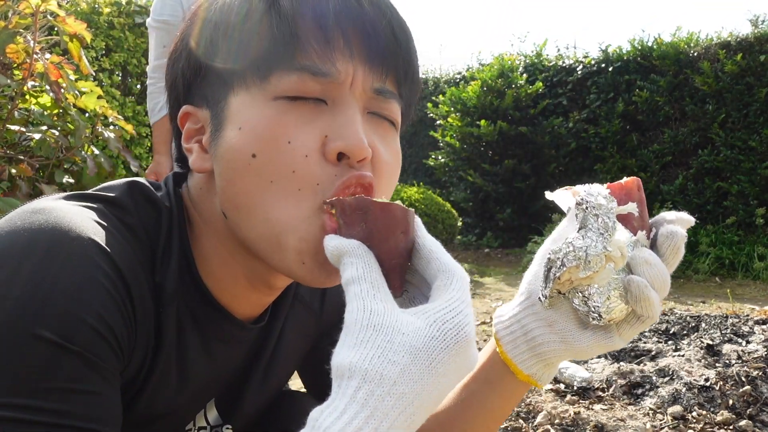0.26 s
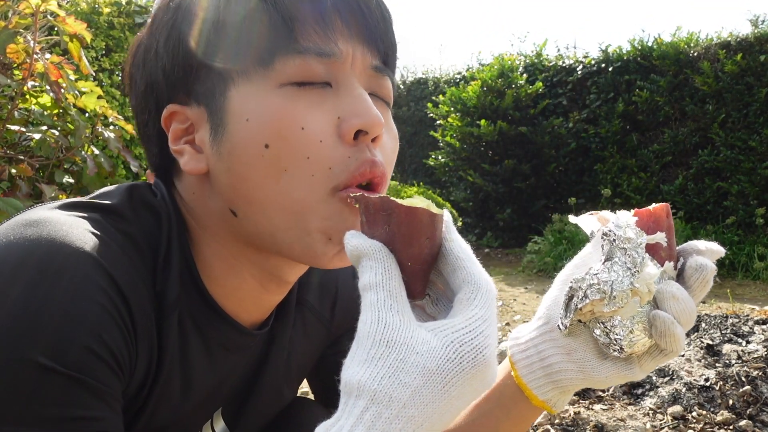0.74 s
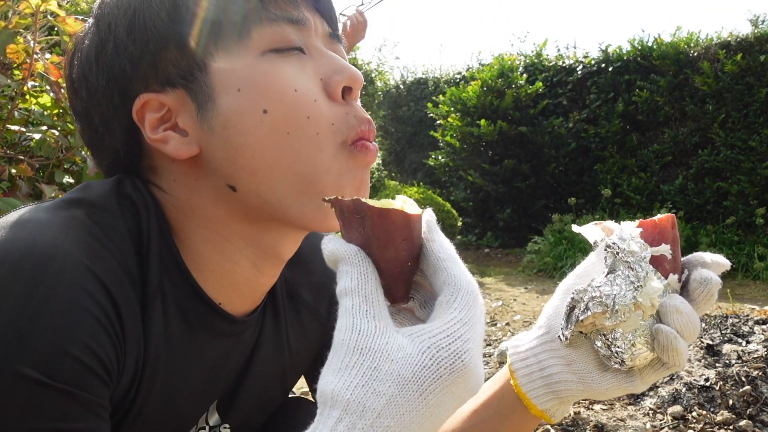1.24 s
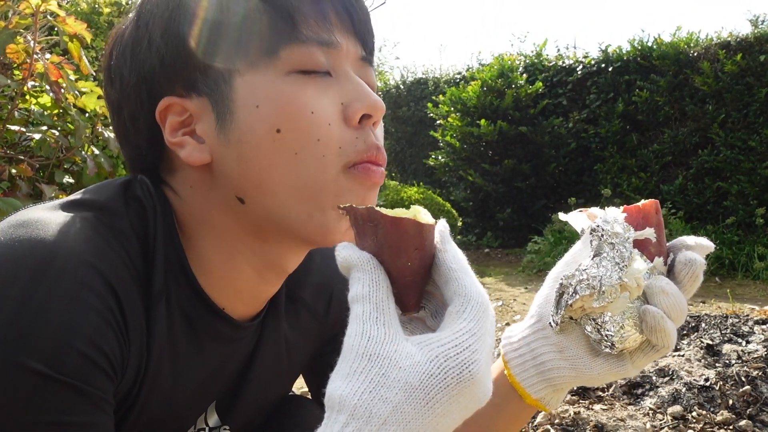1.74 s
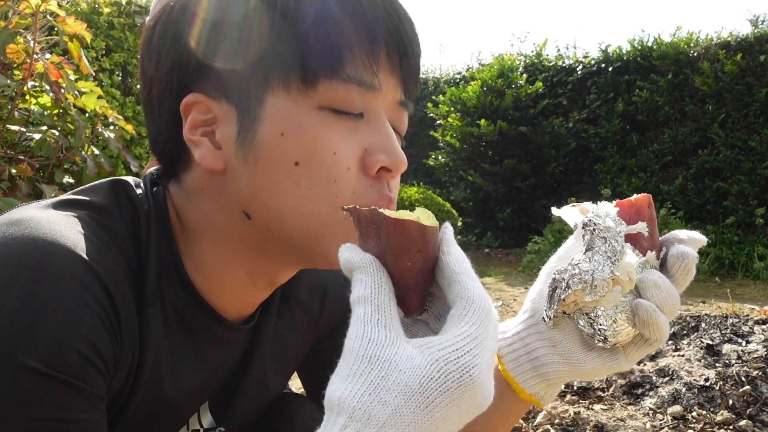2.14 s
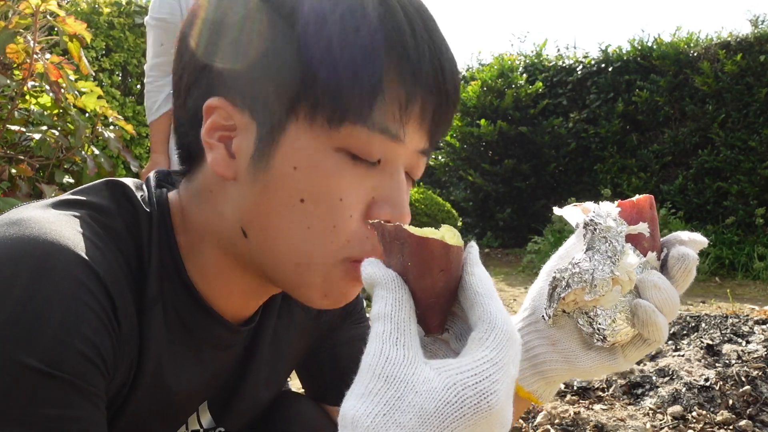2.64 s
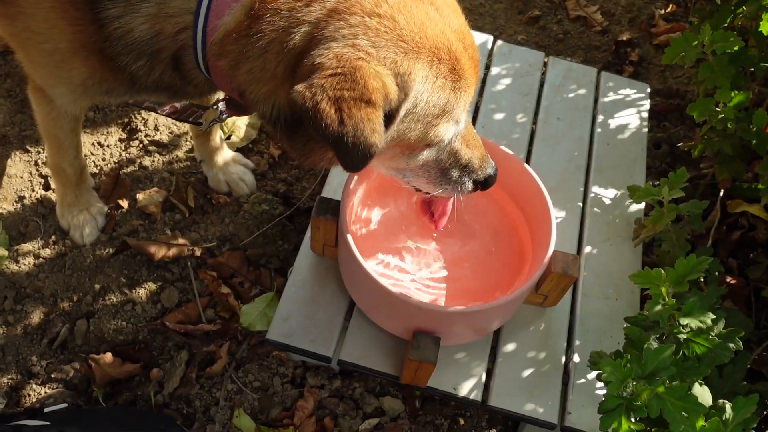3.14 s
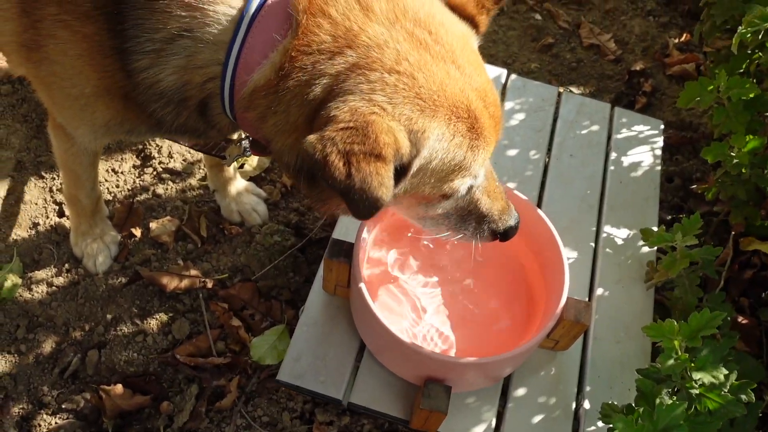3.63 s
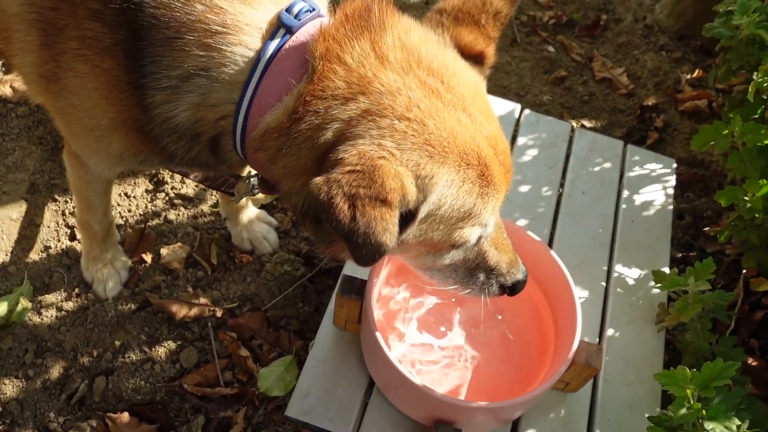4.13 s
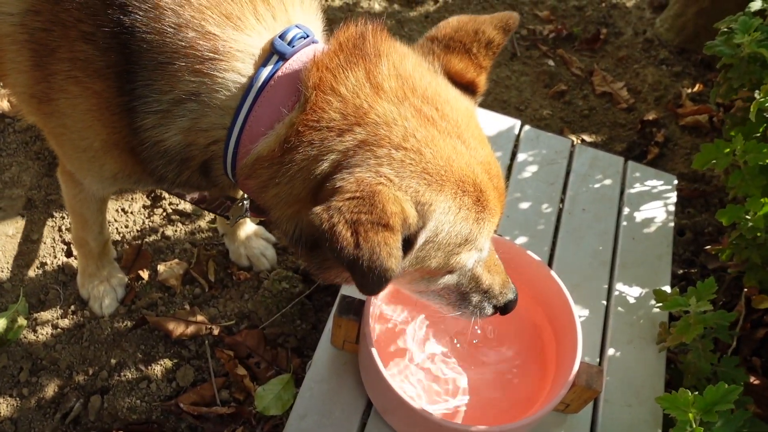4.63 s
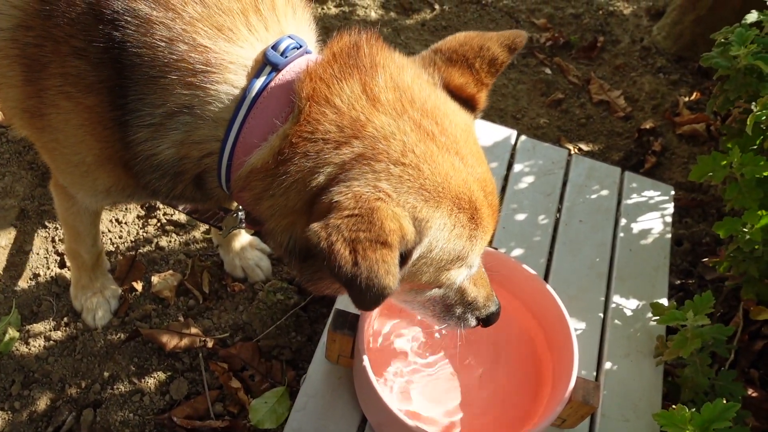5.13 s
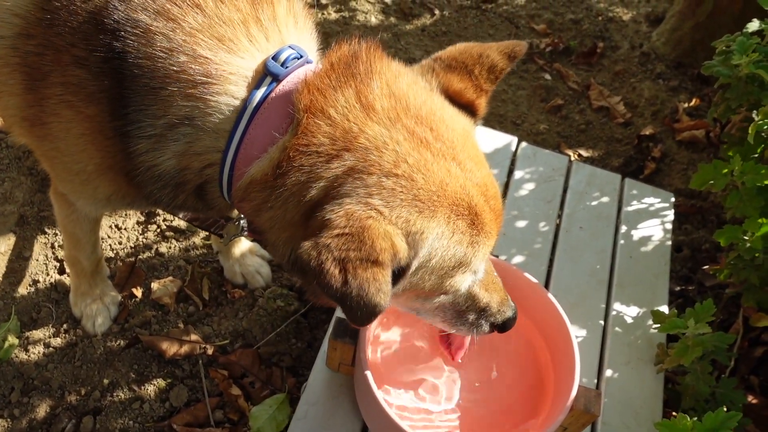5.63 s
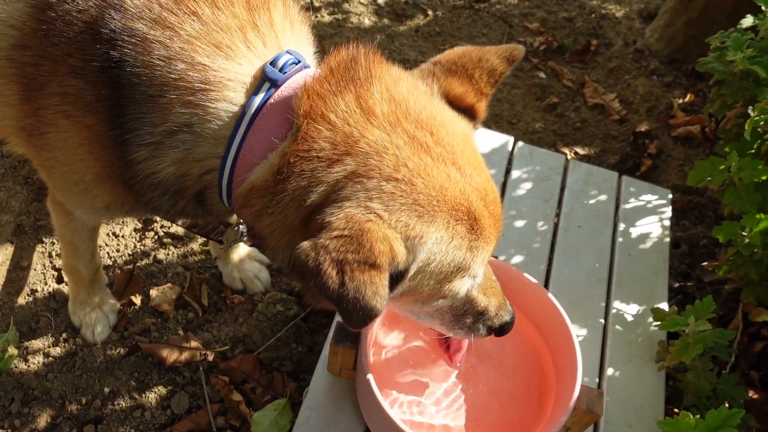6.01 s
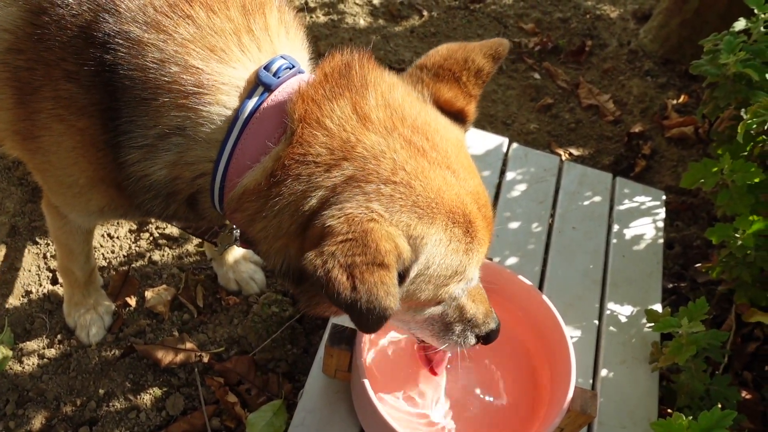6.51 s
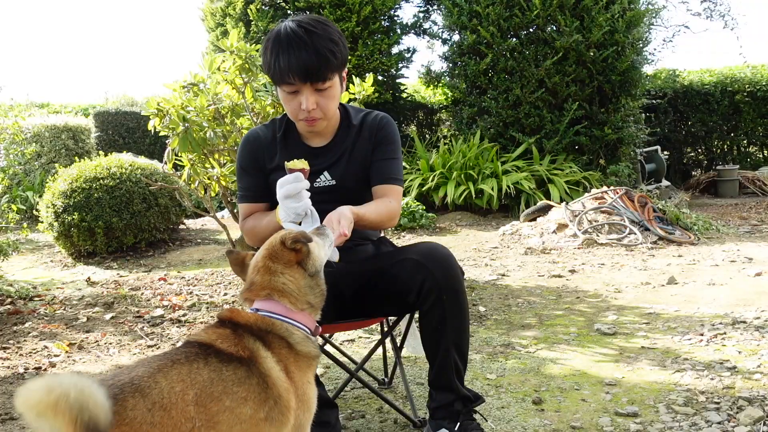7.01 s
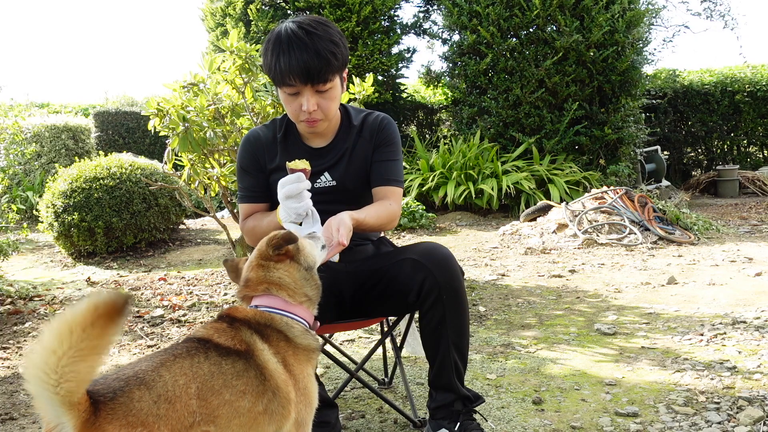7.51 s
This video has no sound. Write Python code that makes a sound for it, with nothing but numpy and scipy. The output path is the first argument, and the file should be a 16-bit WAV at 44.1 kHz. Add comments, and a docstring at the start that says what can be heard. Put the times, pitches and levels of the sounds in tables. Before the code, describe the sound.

From 0 to 2.9 s, a soft outdoor bed: airy hiss and a low far rumble that heaves until about 1.7 s, then fades. Hoarse rising bird calls and short whistles chirp at first, with a fast falling trill near 1.5 s and another call at 2.1 s. A thin, high insect buzz comes and goes. Dull little chewing knocks fall at 1.35, 1.7 and 2.5 s. At 2.9 s the sound cuts to a dog lapping close by, until 6.7 s: about ten main licks, nearly three a second, each a hollow wet pop with tongue dip, crisp smack, bubbly spray and drips, barely reverberant, slightly left. A low steady hum strengthens underneath; falling bird notes, short trills and the insect continue faintly. From 6.7 to 7.85 s the lapping is gone, leaving quieter air, several hoarse bird calls and a soft click at 7.5 s.

```python
"""A dog laps from a bowl close by from 2.9 s to 6.7 s, nearly three licks a second, in a garden with birds.
Each lick is a chain of decaying resonances: air pockets pop and ring, and many tiny bubbles form the spray.
Around it, shaped noise makes the air and a far rumble, which swells and fades before the lapping begins.
A low machine hum is strongest during the lapping. Gliding tones make the bird calls, a tone spread into
a narrow band makes a thin insect note, and damped resonators make soft knocks and clicks of chewing nearby."""
import sys
import numpy as np
from scipy import signal
from scipy.fft import rfft, irfft, next_fast_len
from scipy.io import wavfile

SR = 44100
rng = np.random.default_rng(int(sys.argv[2]) if len(sys.argv) > 2 else 0)


def put_to_file(sound):
    """Save the sound as 16-bit audio at rate SR, in the file named by the first command-line argument."""
    columns = np.atleast_2d(sound).T  # one column per channel
    safe = np.clip(columns, -1, 1)
    whole_steps = np.round(safe * 32767)
    wavfile.write(sys.argv[1], SR, whole_steps.astype(np.int16))


N = 342163
TIME = np.arange(N) / SR
LAPPING_START, LAPPING_END = 2.912, 6.715  # the stretch of the lapping, where the air and hum change [s]

# Licks, each a tongue stroke closing on an air pocket:
# (pop time [s], pop level [dB], nominal pitch [Hz], ring time constant [s], rebound level re the pop [dB],
#  dip lead time [s], dip level [dB], peel level [dB], peel pitch [Hz], smack level [dB],
#  relative spray level [dB], spray decay rate [dB/s], relative slosh level [dB])
LICKS = [(2.9261, -21.5, 1236, 0.0047, -13, .009, -51, -42, 4060, -40, -52, 105, -52.5),
         (3.285, -18.5, 1103, 0.0022, -21, .076, -34, -47, 4300, -57, -53, 64, -48),
         (3.6486, -23, 1714, 0.0037, -22, .074, -33, -37, 5030, -40, -52.5, 87, -53.5),
         (4.1431, -38.5, 1657, 0.0046, -17, .060, -39.5, -53, 3960, -55, -60.5, 39, -53.5),
         (4.5265, -15.5, 1306, 0.0029, -29, .062, -30.5, -34, 3250, -40, -52.5, 80, -53),
         (4.9195, -25, 1294, 0.003, -30, .059, -37.5, -33.5, 4200, -46, -55, 105, -53),
         (5.4107, -21.5, 1196, 0.0054, -24, .010, -52, -39, 3360, -62, -56.5, 53, -51),
         (5.7731, -22.5, 1180, 0.0015, -16, .077, -34, -46, 4740, -41, -53, 113, -51.5),
         (6.154, -16.5, 1251, 0.0038, -6.5, .059, -34.5, -39, 3370, -57, -53, 108, -58.5),
         (6.677, -24.5, 1146, 0.001, -15, .036, -50, -44, 4000, -49, -54, 150, -59)]


def amp(db):
    """Amplitude gain is the exponential of a level in decibels."""
    return 10 ** (np.asarray(db) / 20)


def unit(x):
    """Energy normalization: scales a signal to rms 1."""
    return x / np.sqrt(np.mean(abs(x) ** 2) + 1e-20)


def read(points, hz):
    """Interpolates a spectrum along a logarithmic frequency axis."""
    f, value = np.transpose(points)
    return np.interp(np.log(hz + 1), np.log(f + 1), value)


def curve(rows):
    """Interpolates a level history linearly at every sample."""
    times, values = np.transpose(rows)
    return np.interp(TIME, times, values)


def during(start, end, fade):
    """A gate: 1 between two times, with linear edges centred on them."""
    return np.clip(np.minimum(TIME - start, end - TIME) / fade + .5, 0, 1)


def add(mix, s, sound):
    """Linear superposition: adds a sound at a time, trimmed to the mix."""
    at = round(s * SR)
    sound = sound[..., max(-at, 0):]
    part = mix[..., max(at, 0):][..., :sound.shape[-1]]
    part += sound[..., :part.shape[-1]]


def flutter(size, width_hz):
    """Narrow-band modulation: complex Gaussian noise that spreads a tone into a band when multiplied on it."""
    length = next_fast_len(size + 4096)  # the excess keeps the ends from matching
    hz = np.fft.fftfreq(length, 1 / SR)
    noise = rng.standard_normal(length) + 1j * rng.standard_normal(length)
    return unit(np.fft.ifft(noise * np.exp(-(hz / width_hz) ** 2)))[:size]


def wash(colour):
    """Diffuse noise: spectral shaping sets its colour, and mid and side weights its correlation."""
    # correlation of the two channels in the open air: (frequency [Hz], correlation [0-1])
    likeness = [(60, 1), (150, 0.88), (300, 0.93), (600, 0), (1500, 0.01), (4000, 0.33), (9000, 0.17),
                (15000, 1)]
    size = next_fast_len(N)
    hz = np.fft.rfftfreq(size, 1 / SR)
    mid, side = rfft(rng.standard_normal((2, size))) * amp(read(colour, hz))
    like = np.clip(read(likeness, hz), 0, 1)
    side = side * np.sqrt((1 - like) / (1 + like))
    return unit(irfft(np.array([mid + side, mid - side]), size)[:, :N])


def echoes(x, t60, delay, dull_hz):
    """Diffuse reverberation: convolution with decaying noise, independent in each channel."""
    t = np.arange(SR // 2) / SR
    onset = np.clip(t / delay - 1, 0, 1)
    taps = rng.standard_normal((2, len(t))) * amp(-60 * t / t60) * onset
    lowpass = signal.butter(1, min(dull_hz, SR / 2.2), fs=SR)
    taps = signal.lfilter(*lowpass, taps / np.linalg.norm(taps[0]))
    return signal.oaconvolve(np.broadcast_to(x, (2, N)), taps, axes=1)[:, :N]


def garden(rumble_db=0, waver=0.35, waver_hz=7):
    """Ambient superposition: shaped noise for air and rumble, and a randomly modulated tone for the hum."""
    # air before, during and after the lapping: (frequency [Hz], relative density [dB per Hz])
    air_before = [(20, -32), (40, -19), (62, 1.5), (100, -1.5), (200, 2), (500, -12), (700, -12),
                  (1400, -16), (1800, -16.5), (2150, -15.5), (2600, -25), (4000, -26), (7500, -32),
                  (15500, -36.5)]
    air_during = [(20, -42), (40, -19), (62, 0.5), (85, -0.5), (130, 0.5), (180, -7.5), (300, -12.5),
                  (600, -9), (1000, -14.5), (1700, -14.5), (2500, -24.5), (4000, -22), (8000, -30),
                  (15500, -36)]
    air_after = [(20, -34), (40, -19), (62, -2), (130, 1.5), (200, -4), (360, -5.5), (600, -1.5), (850, -7),
                 (1300, -11.5), (1650, -5.5), (2500, -20), (3700, -14), (7500, -25), (15500, -32.5)]
    # rms levels before, during and after the lapping, of the air and of the hum: (level [dB], ...)
    air_db = [-57.5, -57.5, -60]
    hum_db = [-67.5, -57, -68.5]
    # far rumble before its random heave: (time [s], level [dB])
    rumble_level = [(0.0, -49), (0.02, -46.5), (0.07, -50.5), (0.11, -49), (0.59, -50.5), (0.65, -46.5),
                    (0.86, -48.5), (0.92, -43.5), (0.99, -49), (1.07, -44.5), (1.11, -49), (1.39, -44),
                    (1.49, -53), (1.69, -43), (2.5, -57), (2.51, -52.5), (2.75, -57), (2.9, -49.5)]
    # far rumble: (frequency [Hz], relative density [dB per Hz])
    rumble_colour = [(50, -31.5), (90, -9.5), (140, -12), (185, 0.5), (245, 3.5), (290, -2.5), (370, -19),
                     (460, -9), (560, -23), (900, -65)]
    hum_hz = 99.5
    heave_db, heave_hz = 2.8, 5  # random level modulation: scale and bandwidth

    lapping = during(LAPPING_START, LAPPING_END, 0.004)
    before = during(-1, LAPPING_START, 0.0086)
    stretches = [before, lapping, 1 - lapping - before]
    colours = [air_before, air_during, air_after]
    air = sum(wash(colour) * amp(db) * share for colour, db, share in zip(colours, air_db, stretches))

    heave = heave_db * flutter(N, heave_hz).real
    rumble = wash(rumble_colour) * amp(curve(rumble_level) + rumble_db + heave) * before

    carrier = np.exp(2j * np.pi * hum_hz * TIME)
    hum = unit(((1 + waver * flutter(N, waver_hz)) * carrier).real)
    return air + rumble + hum * sum(amp(db) * share for db, share in zip(hum_db, stretches))


def slide(length, middle_hz, share, arch=0):
    """Frequency glide: a linear slide through the middle pitch, bowed by a parabola."""
    u = np.linspace(-1, 1, int(length * SR))
    return middle_hz * (1 + share * u / 2 - arch * u ** 2)


def note(pitch, width_hz):
    """Phase is the integral of frequency; random modulation spreads a hoarse voice into a band."""
    clear = np.exp(-width_hz / 150)
    voice = np.sqrt(clear) + np.sqrt(1 - clear) * flutter(len(pitch), width_hz * 1.16)
    tone = (voice * np.exp(2j * np.pi * np.cumsum(pitch) / SR)).real
    return unit(tone * signal.windows.tukey(len(pitch), .6))


def birds(direct_db=-2.0, trees_db=-5, trill_trees_db=-8, trill_db=-2):
    """Frequency-modulated calls with diffuse echoes among the trees, over a noise wash of farther birds."""
    # Call levels are relative: the direct and echoed gains above follow. Blur sets how hoarse a note is.
    # hoarse rising calls: (time [s], length [s], start pitch [Hz], level [dB], rasp level re the call [dB])
    cries = [(.14, .12, 2800, -63.5, -5), (0.309, 0.18, 3310, -62.5, -8), (.766, .14, 2590, -66.5, -15),
             (2.04, 0.16, 3970, -67, -22), (2.147, 0.18, 2940, -57.5, -23), (6.689, .12, 3180, -53.5, -22),
             (7.167, .056, 3210, -60, -18), (7.287, 0.15, 3580, -66.5, -22),
             (7.392, 0.13, 2850, -59.5, -24)]
    # thin calls that shoot up and level off: (time [s], level [dB])
    sweeps = [(1.745, -65.5), (7.045, -63.5)]
    # clear whistles: (time [s], length [s], middle pitch [Hz], slide [share of pitch], level [dB])
    whistles = [(0.0, .1, 4100, .12, -61.5), (.259, .068, 2340, .12, -65), (.438, .08, 2020, .06, -57),
                (.532, .05, 4400, .11, -65), (.546, .06, 2440, .08, -61), (.909, .06, 4080, .09, -63.5),
                (.915, .07, 2060, -.02, -59)]
    # arched whistle: (time [s], length [s], top pitch [Hz], slide [share], arch [share], level [dB])
    arched = [(2.798, 0.11, 3650, 0.057, 0.19, -61)]
    # one bird's repeated falling note: (time [s], middle pitch [Hz], level [dB])
    falls = [(1.885, 3480, -64.5), (2.709, 3060, -71), (3.935, 3086, -60.5), (5.06, 3130, -58),
             (5.781, 3080, -61), (6.37, 3270, -57.5)]
    # trills of falling notes: (time [s], note period [s], notes [count], note length [s], top pitch [Hz],
    #  bottom pitch [Hz], first level [dB], last level [dB], blur [Hz])
    trill_rows = [(1.347, .0655, 3, .044, 4100, 3400, -76, -68, 160),
                  (1.543, .0655, 10, .044, 4100, 3400, -60, -55.5, 40),
                  (3.225, .068, 5, .05, 4450, 4000, -58, -58, 120),
                  (4.335, .058, 4, .052, 3850, 3500, -59, -57, 200),
                  (6.21, .0615, 8, .068, 3920, 3500, -58.5, -54, 260)]
    # blurred chatter of farther birds: (time [s], level [dB])
    chatter = [(0, -68), (.3, -61), (.6, -62.5), (1.3, -72.5), (2.7, -75), (3.5, -60.5), (3.9, -71),
               (7.76, -67)]
    # chatter colour: (frequency [Hz], relative density [dB per Hz])
    chatter_colour = [(1500, -28), (2100, 8), (2450, 1), (2800, 1), (3400, 3), (4200, 2.5), (5200, -7),
                      (7500, -21)]
    cry_rise, upper_ratio, upper_db = 1.29, 1.3, -8.5  # each cry climbs, with a weaker second voice above
    cry_width_hz, rasp_width_hz = 300, 1600  # blur of the cry and of its smeared octave
    sweep_s, sweep_bend_s, sweep_width_hz = .18, .055, 300
    sweep_from_hz, sweep_to_hz = 3000, 7000
    whistle_arch, whistle_width_hz = .025, 28
    fall_s, fall_slide, fall_width_hz = .105, -0.139, 160

    song, trills = np.zeros((2, N))
    for s, length, hz, db, rasp_db in cries:
        pitch = np.linspace(hz, hz * cry_rise, int(length * SR))
        lower = note(pitch, cry_width_hz)
        upper = note(pitch * upper_ratio, cry_width_hz)
        add(song, s, amp(db) * (lower + amp(upper_db) * upper))
        add(song, s, amp(db + rasp_db) * note(2 * pitch, rasp_width_hz))
    for s, db in sweeps:
        to_go = np.exp(-np.arange(0, sweep_s, 1 / SR) / sweep_bend_s)
        pitch = sweep_to_hz + (sweep_from_hz - sweep_to_hz) * to_go
        add(song, s, amp(db) * note(pitch, sweep_width_hz))
    for s, length, hz, share, db in whistles:
        add(song, s, amp(db) * note(slide(length, hz, share, whistle_arch), whistle_width_hz))
    for s, length, hz, share, arch, db in arched:
        add(song, s, amp(db) * note(slide(length, hz, share, arch), whistle_width_hz))
    for s, hz, db in falls:
        add(song, s, amp(db) * note(slide(fall_s, hz, fall_slide), fall_width_hz))
    for s, period, notes, length, top_hz, bottom_hz, first_db, last_db, width_hz in trill_rows:
        for k, db in enumerate(np.linspace(first_db, last_db, notes)):
            pitch = np.linspace(top_hz, bottom_hz, int(length * SR))
            add(trills, s + k * period, amp(db) * note(pitch, width_hz))
    to_trees = amp(trees_db) * song + amp(trill_trees_db) * trills
    scattered = echoes(to_trees, t60=0.47, delay=0.006, dull_hz=9200)
    farther = wash(chatter_colour) * amp(curve(chatter))
    return amp(direct_db) * song + amp(trill_db) * trills + scattered + farther


def insect(width_hz=210, scatter_db=-6):
    """Random modulation broadens a tone into a narrow buzz, whose level shivers, followed by diffuse echoes."""
    # thin phrases, levels before fades and shiver: (start [s], end [s], pitch [Hz], level [dB])
    phrases = [(-.1, 0.496, 6320, -74.5), (0.745, 1.242, 6340, -75.5), (1.853, 2.319, 6310, -74.5),
               (2.6, 2.996, 6400, -76), (2.961, 3.76, 5470, -72.5), (3.754, 4.724, 5560, -68.5),
               (5.05, 5.545, 6170, -81), (6.703, 7.596, 6520, -85), (7.298, 7.851, 5440, -80)]
    buzz = np.zeros(N)
    for start, end, hz, db in phrases:
        t = np.arange(int((end - start) * SR)) / SR
        tone = (flutter(len(t), width_hz) * np.exp(2j * np.pi * hz * t)).real
        fades = signal.windows.tukey(len(t), .6)
        shiver = amp(2 * flutter(len(t), 12).real)
        add(buzz, start, amp(db) * unit(tone) * fades * shiver)
    return buzz + amp(scatter_db) * echoes(buzz, t60=0.23, delay=0.034, dull_hz=10200)


def bubble(hz, ring, glide, swell_cycles=1.0, swell_s=0.00017):
    """Damped air-pocket resonance: a quick swell, exponential decay and pitch drift (complex, peak 1)."""
    t = np.arange(int(7 * ring * SR) + 64) / SR
    swell = 1 - np.exp(-(t / (swell_cycles / hz + swell_s)) ** 2)
    level = swell * np.exp(-t / ring)
    pitch = hz * (1 + glide * np.tanh((t / ring - 1) / 2))
    return level / level.max() * np.exp(2j * np.pi * np.cumsum(pitch) / SR)


def knocks():
    """Impulse response of damped resonators: soft knocks and clicks of chewing nearby."""
    # knocks and clicks: (time [s], level [dB], pitch [Hz], ring time constant [s])
    knock_rows = [(.783, -53, 4200, .0005), (1.353, -42, 500, 0.0036), (1.673, -44.5, 544, 0.003),
                  (1.69, -60, 3600, .0005), (2.518, -44, 405, 0.002), (7.501, -45, 1570, 0.0017)]
    out = np.zeros(N)
    for s, db, hz, ring in knock_rows:
        add(out, s, amp(db) * bubble(hz, ring, 0).imag)
    return out


def squelches(width_hz=330, grain_hz=200):
    """Cavity resonance: the pitch of a ragged, sputtering tone climbs as the wet cavity closes."""
    # squelches: (time [s], level [dB])
    squelch_rows = [(3.284, -57), (3.413, -57), (4.271, -59), (5.543, -57.5), (5.924, -59.5)]
    size = int(0.024 * SR)  # each lasts 24 ms
    from_hz, to_hz = 1300, 3700
    out = np.zeros(N)
    turn = np.exp(2j * np.pi * np.cumsum(np.geomspace(from_hz, to_hz, size)) / SR)
    for s, db in squelch_rows:
        sputter = flutter(size, width_hz) * abs(flutter(size, grain_hz))
        add(out, s, amp(db) * unit((sputter * turn).real * signal.windows.tukey(size, .5)))
    return out


def smack(db, decay, low_hz=6500, high_hz=13000, apart=0.55, attack_s=.0004):
    """Broadband transient: a decaying burst of bright noise, partly correlated between the sides."""
    t = np.arange(2048) / SR
    band = signal.butter(2, [low_hz, min(high_hz, SR / 2.2)], "band", fs=SR)
    shared, left, right = signal.lfilter(*band, rng.standard_normal((3, len(t))))
    crackle = unit(shared + apart * np.array([left, right]))
    return amp(db) / 2 * crackle * np.exp(-t / decay) * np.minimum(t / attack_s, 1)


def pop(db, hz, ring, pan, glide=0.02, snap_db=-16, snap_s=0.0013, snap_ratio=4.2,
        lead=0.18, lead_hz=1250, swell_share=.13):
    """Air-pocket resonance excited by a wet noise snap; long rings swell slowly."""
    t = np.arange(512) / SR
    # small pockets snap brighter
    wet = signal.butter(2, [hz * 0.51, min(hz * snap_ratio, 11500)], "band", fs=SR)
    snap = unit(signal.lfilter(*wet, rng.standard_normal(len(t))))
    snap = snap * np.exp(-t / snap_s) * (1 - np.exp(-t * hz))
    # mouth-sized pockets lead in phase at the left [rad]
    ahead = lead * np.exp(-(2 * np.log(hz / lead_hz)) ** 2)
    ring = max(ring, .0002)
    tone = bubble(hz, ring, glide * rng.uniform(0, .6), swell_cycles=0.83, swell_s=swell_share * ring)
    out = np.zeros((2, SR // 10))
    add(out, 0, (tone * np.exp(1j * np.array([[ahead], [0]]))).imag)
    add(out, 0, amp(snap_db) * snap)
    return amp(db + np.array([[pan], [-pan]]) / 2) * out


def drops():
    """Bubble resonances and noise transients: single drops and wet smacks between the licks."""
    # drops and bubbles: (time [s], level [dB], pitch [Hz], ring time constant [s], left minus right [dB])
    drop_rows = [(2.888, -43, 560, .0067, -10), (2.917, -29.5, 4030, 0.0018, -3),
                 (2.9324, -24, 1233, .0027, 0), (2.9676, -27, 1640, 0.00098, -1),
                 (2.9866, -36.5, 4700, .0014, -1), (3.0104, -39, 1660, 0.002, 0),
                 (3.0239, -41, 4180, .0031, -4), (3.0464, -28, 4400, 0.00084, -3),
                 (3.0704, -33, 7850, 0.0014, -3), (3.0746, -31, 1700, 0.00039, 0),
                 (3.1078, -23, 6340, 0.0015, -4), (3.1254, -42, 7160, .001, -6),
                 (3.239, -35.5, 1450, 0.0033, -1), (3.259, -29, 4760, 0.0015, -3),
                 (3.276, -27, 4500, 0.0013, -3), (3.3048, -35, 3280, .0006, -2),
                 (3.326, -39, 1510, 0.0015, 1), (3.3446, -38, 4660, .0012, -1),
                 (3.3774, -34, 5150, 0.0027, 2), (3.417, -34, 1890, 0.0022, 0),
                 (3.468, -36.5, 4070, 0.0016, -4), (3.591, -34, 1200, 0.0062, -2),
                 (3.6122, -33, 3010, .0025, -2), (3.6557, -33.5, 1210, 0.0031, -1),
                 (3.7197, -41, 664, 0.0025, -2), (3.7928, -43, 543, .0086, -12),
                 (3.8179, -35.5, 550, 0.0022, 1), (3.869, -44.5, 2200, 0.0019, -2),
                 (3.9574, -32, 1673, 0.0048, -2), (3.9698, -33.5, 1380, 0.0023, -1),
                 (4.0733, -35, 1440, .0005, -1), (4.085, -38.5, 1460, 0.0023, -2),
                 (4.186, -40.5, 1690, 0.0018, 0), (4.243, -43.5, 740, 0.0041, -2),
                 (4.2759, -37.5, 1940, .0007, 0), (4.289, -39, 3560, 0.0015, 3),
                 (4.344, -35, 7400, 0.00035, -4), (4.574, -38.5, 1570, .0016, -1),
                 (4.5803, -42, 873, 0.0041, -5), (4.673, -31.5, 1400, 0.00072, -2),
                 (4.755, -43, 1090, .003, -3), (4.883, -31, 7100, 0.00023, -5),
                 (4.9598, -34, 4930, 0.00031, -5), (5.1067, -42.5, 580, .0062, 0),
                 (5.152, -42.5, 6900, .0005, -2), (5.2, -42.5, 2760, 0.0019, 0),
                 (5.2376, -43.5, 520, .0063, -6), (5.253, -42.5, 670, 0.0033, -3),
                 (5.277, -39.5, 1280, 0.0021, -5), (5.4353, -38, 1790, .0027, -2),
                 (5.461, -42, 1240, .0048, -2), (5.4913, -40.5, 667, .0046, -3),
                 (5.4987, -24.5, 2020, 0.0023, 0), (5.5038, -36.5, 2130, 0.0088, 1),
                 (5.5303, -35, 1760, 0.00088, -1), (5.5405, -28, 1890, 0.0037, -1),
                 (5.5524, -32.5, 1690, 0.0018, -1), (5.5584, -36.5, 2010, .0022, 0),
                 (5.5787, -38.5, 750, .0026, 0), (5.5972, -34.5, 7500, 0.0003, -3),
                 (5.705, -39.5, 1360, 0.005, -3), (5.763, -30.5, 5800, 0.00033, -4),
                 (5.782, -39, 3300, 0.0049, -2), (5.7899, -38, 2370, .0021, -3),
                 (5.9223, -36.5, 1840, 0.0018, 0), (6.1503, -25, 1500, 0.0012, 0),
                 (6.243, -42.5, 640, 0.0031, -2), (6.505, -45, 6130, 0.00087, -2),
                 (6.6794, -32.5, 1810, 0.0022, 0), (6.6936, -40.5, 2750, 0.0043, 1)]
    # crisp smacks as wet skin peels apart: (time [s], level [dB], time constant [s])
    smack_rows = [(3.4495, -41.5, .001), (4.109, -36, 0.0043), (4.344, -40, .0008), (4.909, -36, .001)]
    out = np.zeros((2, N))
    for s, db, hz, ring, pan in drop_rows:
        add(out, s, pop(db, hz, ring, pan))
    for s, db, decay in smack_rows:
        add(out, s, smack(db, decay))
    return out


def droplets(colour, per_s, cycles, spread_db, pan_db, count=36):
    """Shot noise: random impulses excite bubbles of many sizes, a few much louder than the rest."""
    out = np.zeros((2, N))
    for hz in np.geomspace(colour[0][0], colour[-1][0], count):
        chance = rng.random(N)
        size = np.minimum(rng.exponential(1, N), 3.5)
        clicks = (chance < per_s / count / SR) * amp(spread_db * size + read(colour, hz))
        ring = bubble(hz, cycles * rng.uniform(0.84, 2.85) / hz, 0.029)
        ring = ring / np.linalg.norm(ring)
        pan = pan_db + 2 * rng.standard_normal()
        turn = .5 * rng.standard_normal()  # phase difference between the sides [rad]
        sides = amp(np.array([[pan], [-pan]]) / 2) * np.exp(1j * np.array([[turn], [0]]))
        for at in np.flatnonzero(clicks):
            add(out, at / SR, clicks[at] * (sides * ring).imag)
    return unit(out)


def stirred(s, dip_s, db, fall_db_per_s, early_db, burst_s, linger_db, attack_s=0.0071):
    """Excitation and decay: a stir from the dip on, a burst at the pop, then exponential settling."""
    t = np.arange(SR) / SR - dip_s - attack_s  # zero at the pop
    attack = np.clip((t - t[0]) / attack_s, 0, 1)
    settling = amp(np.where(t < 0, early_db, linger_db - fall_db_per_s * t)) * attack
    level = np.zeros(N)
    add(level, s + t[0], amp(db) * (settling + np.exp(-(t / burst_s) ** 2)))
    return level


def licks():
    """Successive resonances: the tongue dips and peels away, and the mouth shuts on air that pops and rebounds."""
    pan = -3  # left minus right [dB]
    dip_hz, dip_ring_s = 1220, 0.0028  # nominal plop of the tongue entering the water
    tick_db, tick_hz, tick_ring_s = -9.5, 3580, 0.002  # a nominal brighter tick on top, level re the dip
    smack_lead_s, smack_s = 0.012, 0.0031  # wet lips part with a crisp smack
    peel_lead_s, peel_ring_s = .006, 0.0012  # the tongue peels off the water just before the pop
    overtone_ratio, overtone_db, overtone_ring_s = 2.15, -21, 0.0037  # second resonance of the mouth
    bowl_db, bowl_hz, bowl_ring_s = -35, 1282, 0.0061  # the bowl rings faintly under every pop
    rebound_s, rebound_ring_s = .0058, 0.003  # the pocket closes a second time

    out = np.zeros((2, N))
    for s, db, hz, ring, rebound_db, dip_s, dip_db, peel_db, peel_hz, smack_db, *_ in LICKS:
        add(out, s - dip_s, pop(dip_db, dip_hz * rng.uniform(0.88, 1.05), dip_ring_s, pan))
        add(out, s - dip_s, pop(dip_db + tick_db, tick_hz * rng.uniform(0.84, 1.18), tick_ring_s, 0))
        add(out, s - smack_lead_s, smack(smack_db, smack_s))
        add(out, s - peel_lead_s, pop(peel_db, peel_hz, peel_ring_s, pan))
        add(out, s, pop(db, hz, ring, pan))
        add(out, s, pop(db + overtone_db, hz * overtone_ratio, overtone_ring_s, pan))
        add(out, s, pop(db + bowl_db, bowl_hz, bowl_ring_s, 0))
        rebound_hz = hz * rng.uniform(0.9, 1.02)
        add(out, s + rebound_s, pop(db + rebound_db, rebound_hz, rebound_ring_s, pan))
    return out


def dog(spray_db=-3, drips_db=-4.5, slosh_db=-5, plips_db=-8, yard_db=-17, clump_db=9.5, clump_hz=45):
    """Superposed bubble resonances of the lapping, with a short diffuse scatter from bowl, boards and ground."""
    # larger ringing drips, fine spray, slosh, and small plips of water falling back:
    # each (frequency [Hz], relative level [dB])
    drips_colour = [(2000, -6), (4500, 1), (9000, -6.5)]
    spray_colour = [(2200, -24), (3300, 6), (4600, -0.5), (6500, 1), (8000, -3.5), (10500, -12),
                    (15500, -31)]
    slosh_colour = [(420, -37), (600, 2), (850, -2.5), (1250, -3), (1750, 2.5), (2300, -13)]
    plips_colour = [(1150, 1.5), (1600, -2), (2400, -13.5)]

    thrown, rocked = np.zeros((2, N))
    for s, _, _, _, _, dip_s, *_, thrown_db, fall_db_per_s, rocked_db in LICKS:
        throw = stirred(s, dip_s, thrown_db, fall_db_per_s, early_db=-3.5, burst_s=0.0078, linger_db=0)
        rock = stirred(s, dip_s, rocked_db, fall_db_per_s=28, early_db=-2, burst_s=0.0049, linger_db=0)
        thrown = np.hypot(thrown, throw)  # powers add
        rocked = np.hypot(rocked, rock)
    clumps = clump_db * np.tanh(flutter(N, clump_hz).real)  # droplets land in bunches
    spray = droplets(spray_colour, per_s=2200, cycles=2.8, spread_db=2.7, pan_db=-3.0) * amp(spray_db)
    drips = droplets(drips_colour, per_s=340, cycles=6.5, spread_db=3.5, pan_db=-1.5) * amp(drips_db)
    slosh = droplets(slosh_colour, per_s=340, cycles=2.9, spread_db=4.2, pan_db=-2.3) * amp(slosh_db)
    plips = droplets(plips_colour, per_s=45, cycles=4.5, spread_db=2.5, pan_db=-1.2) * amp(plips_db)
    splash = (spray + drips) * thrown * amp(clumps) + (slosh + plips) * rocked * amp(clumps / 2)
    water = licks() + drops() + squelches() + splash * during(LAPPING_START, LAPPING_END, 0.01)
    return water + amp(yard_db) * echoes(water, t60=0.1, delay=0.0036, dull_hz=6100)


def scene():
    """Linear superposition of the garden, the chewing nearby and the dog in front."""
    return garden() + birds() + insect() + knocks() + dog()


def record(dry):
    """Band limiting: a steep linear-phase low-pass at 15.9 kHz."""
    lowpass = signal.firwin(511, 15900, window=("kaiser", 9), fs=SR)
    return signal.oaconvolve(dry, lowpass[None], "same")


dry = scene()
out = record(dry)
put_to_file(out)
```